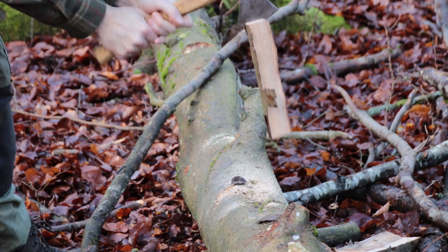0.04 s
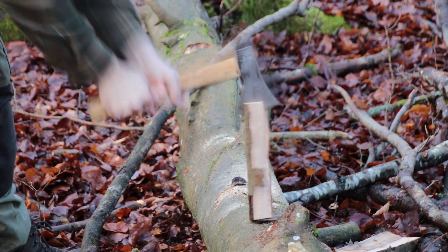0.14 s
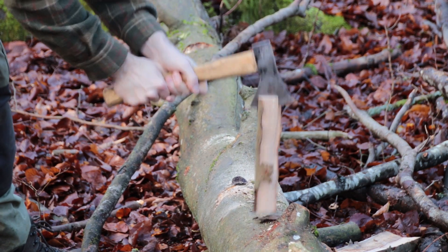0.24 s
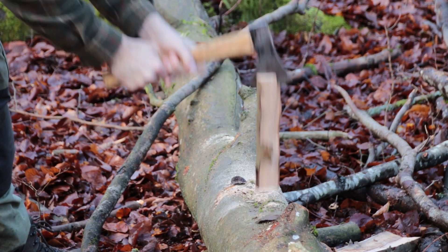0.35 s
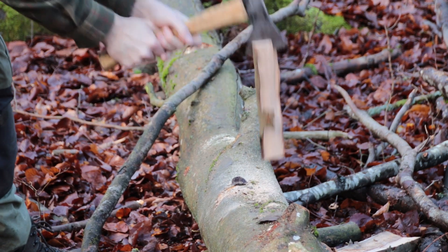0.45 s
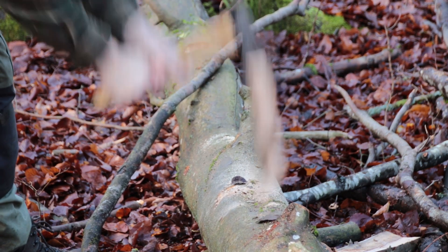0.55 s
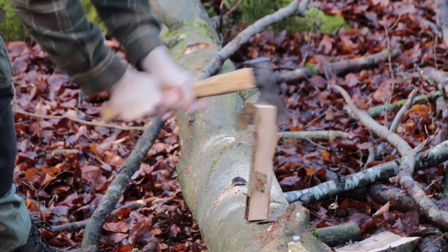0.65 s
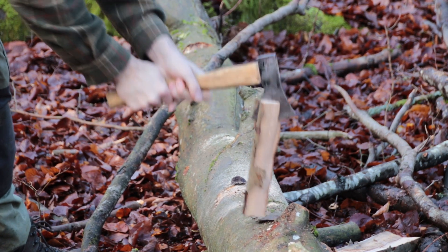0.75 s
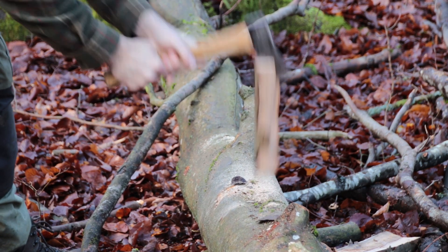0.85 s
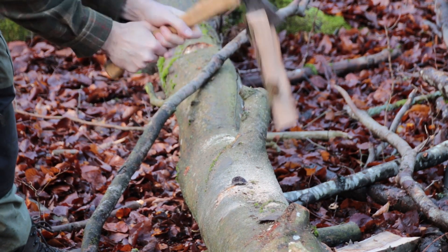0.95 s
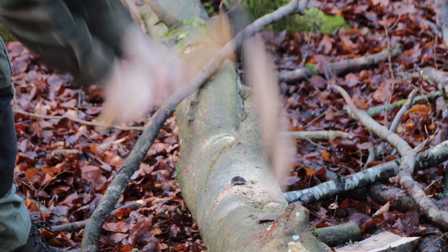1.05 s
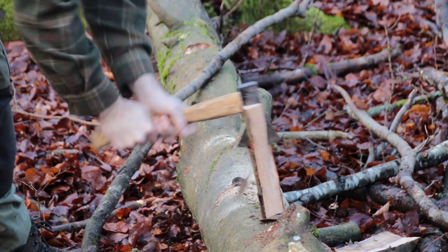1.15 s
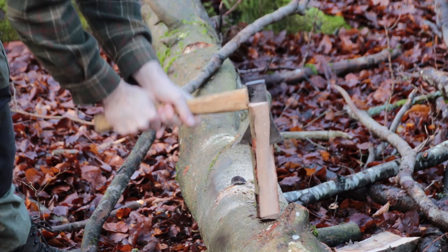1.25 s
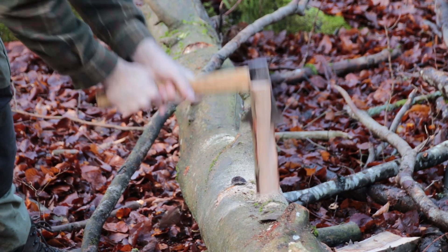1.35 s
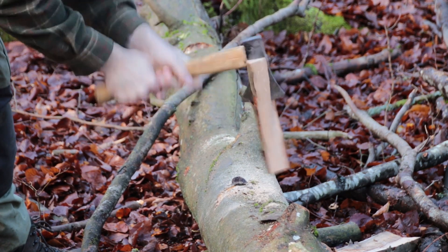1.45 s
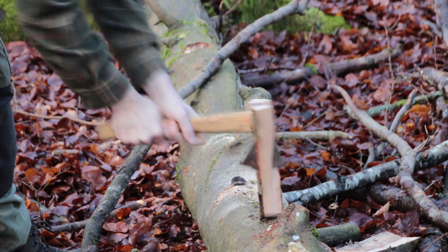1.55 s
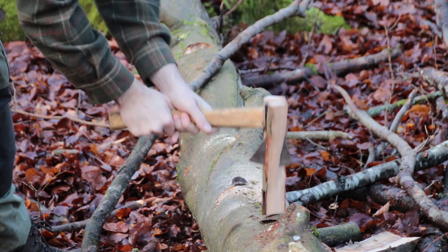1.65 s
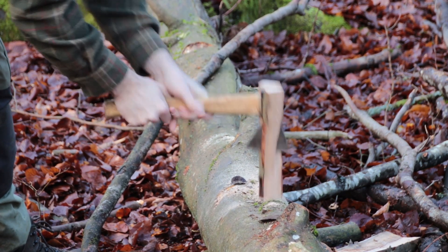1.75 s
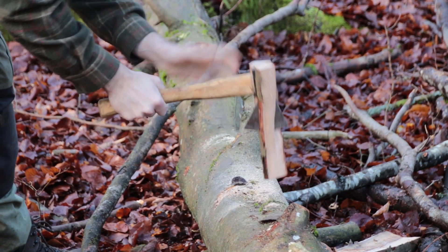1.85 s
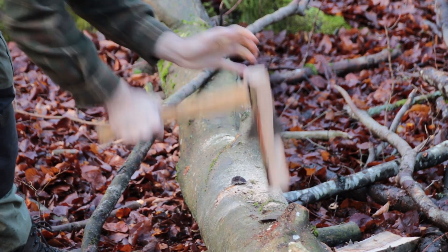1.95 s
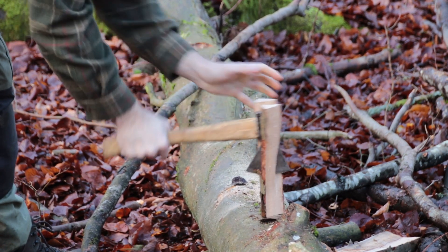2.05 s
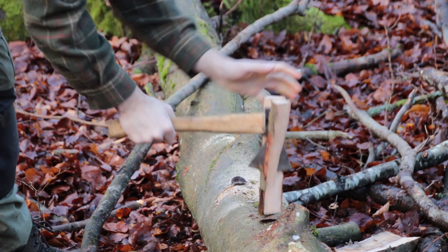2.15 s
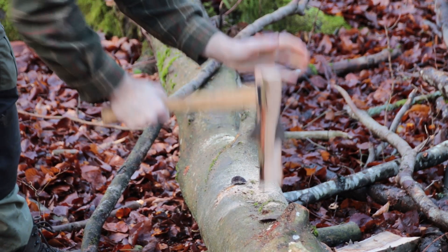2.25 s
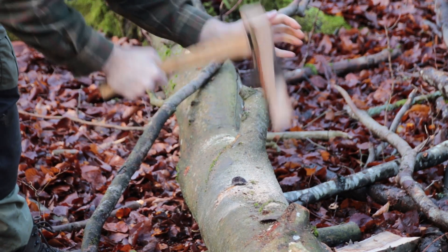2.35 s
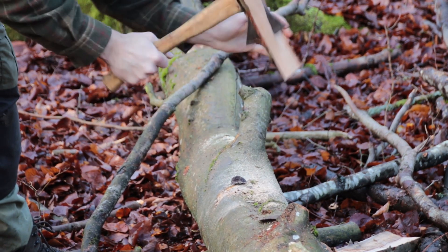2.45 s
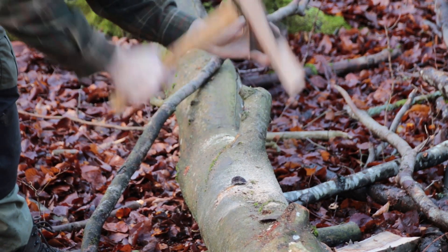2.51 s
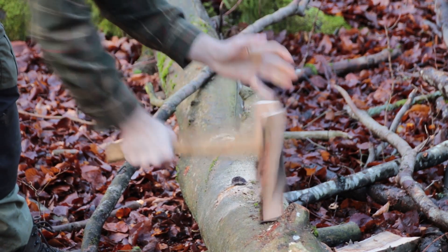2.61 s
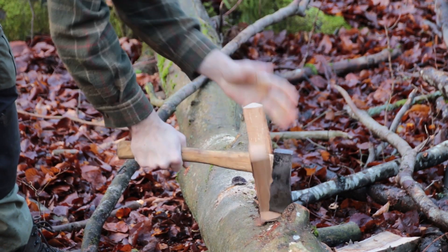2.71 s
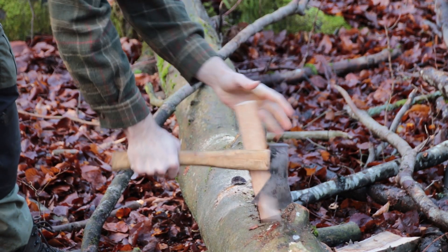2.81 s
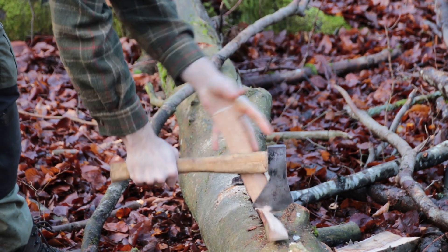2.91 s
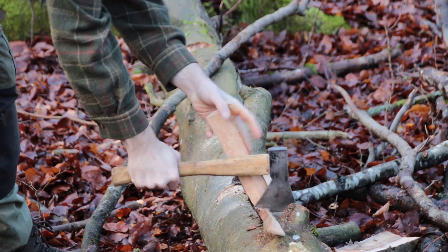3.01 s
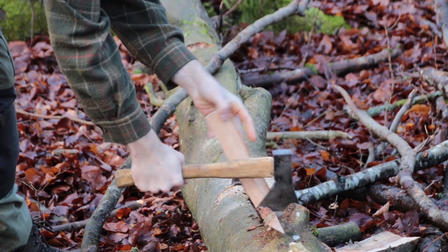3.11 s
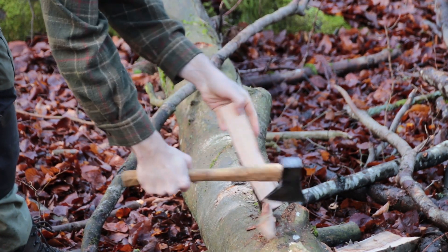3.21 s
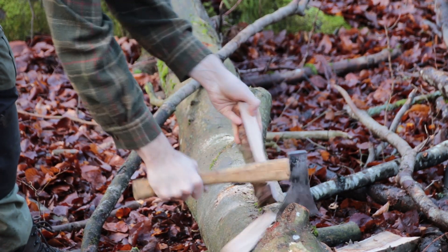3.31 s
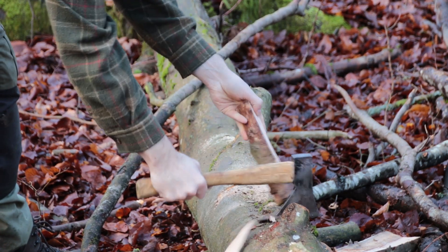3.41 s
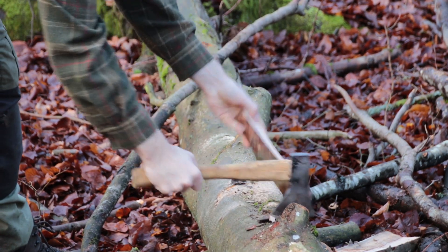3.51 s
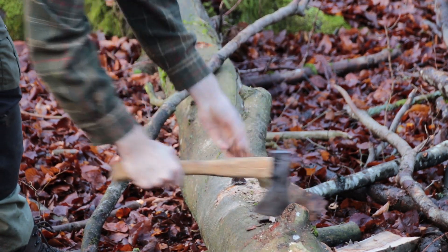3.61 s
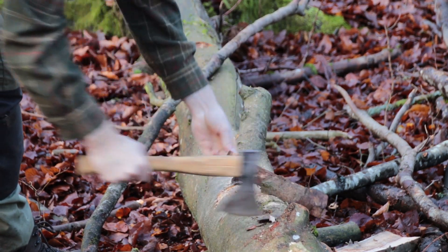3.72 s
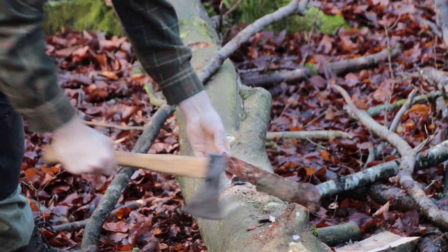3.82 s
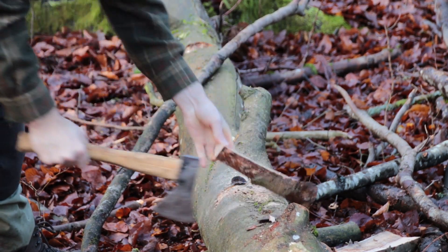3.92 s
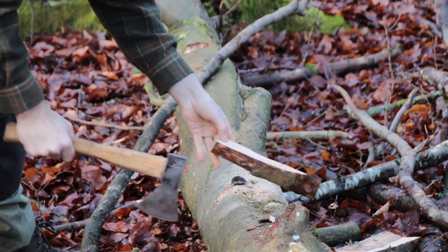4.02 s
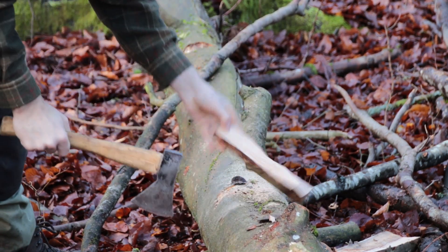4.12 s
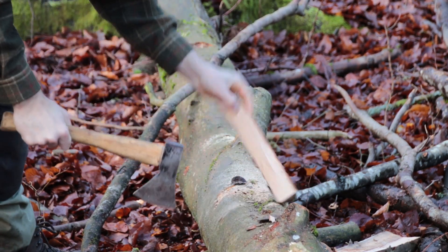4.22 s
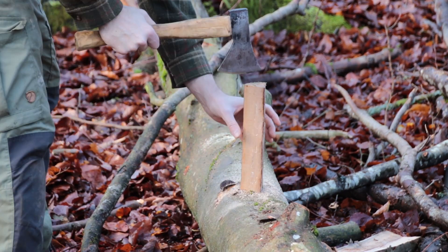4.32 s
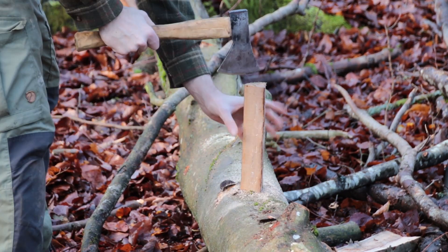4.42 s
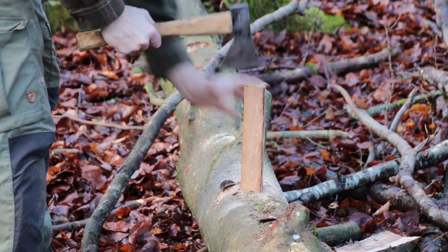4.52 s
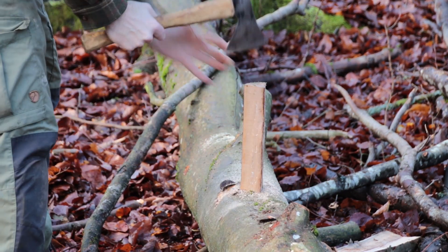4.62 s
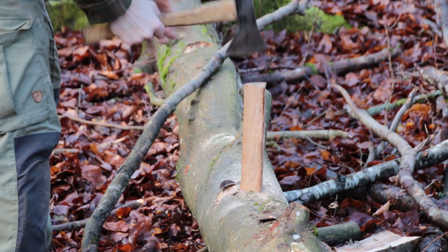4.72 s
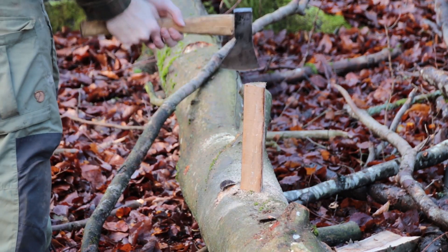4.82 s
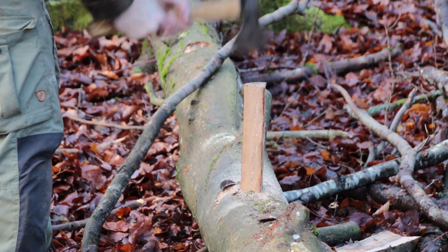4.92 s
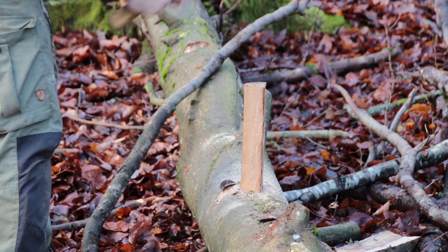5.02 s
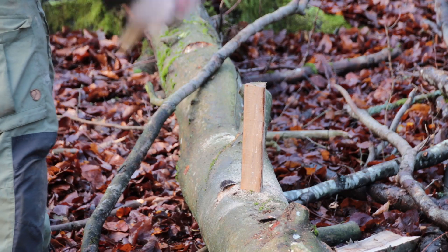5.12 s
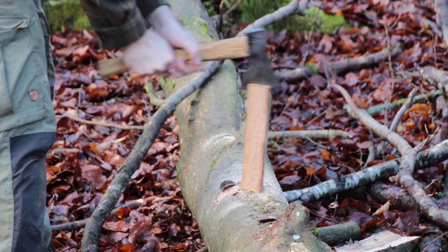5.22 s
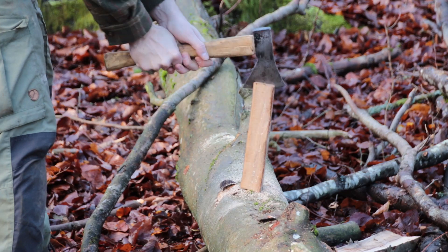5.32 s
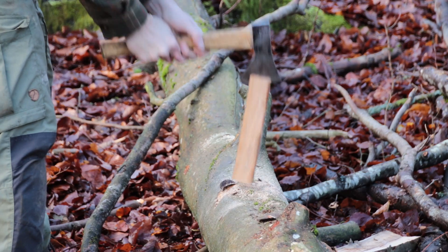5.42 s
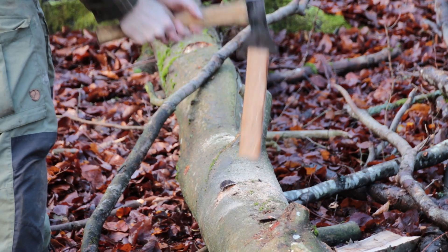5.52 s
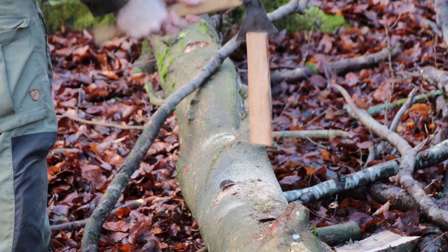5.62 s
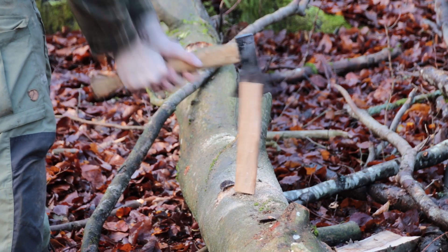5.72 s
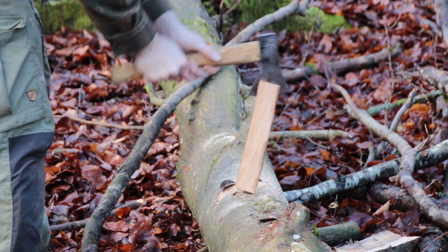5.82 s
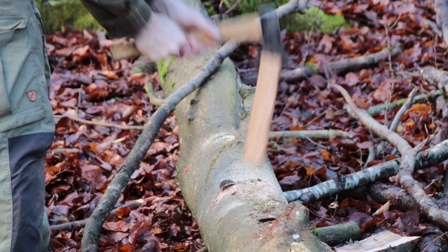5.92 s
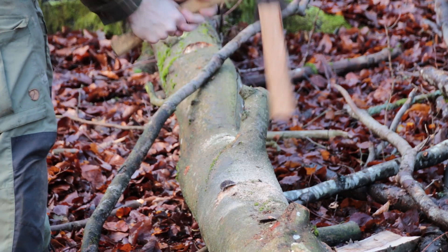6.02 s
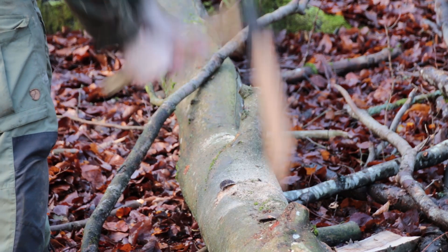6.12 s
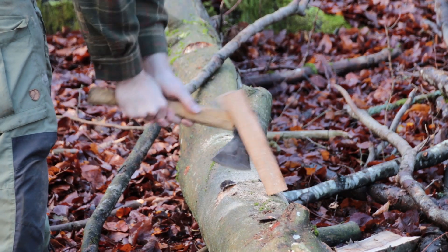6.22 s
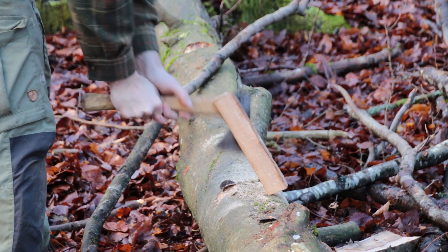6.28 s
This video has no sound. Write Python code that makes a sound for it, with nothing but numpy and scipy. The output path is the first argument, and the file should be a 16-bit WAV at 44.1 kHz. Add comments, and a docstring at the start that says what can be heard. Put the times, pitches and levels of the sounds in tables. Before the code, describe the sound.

A close microphone in a quiet forest hears a hatchet wedged in a billet being banged on a fallen log. Short, heavy, hollow thumps land at about 0.25, 0.7, 1.2, 1.6, 2.1 and 2.7 seconds, each bursting at once into dry cracks and tearing fibres. The 1.2 second blow is the strongest, with a very faint steel ring; the 2.1 second one splinters less. Small ticks and rubs fill the gaps. A weak knock and crackle come near 3.0, then handling ticks, tiny blade clinks and a clearer bark scrape around 3.4-3.65. Soft rustling leads to a light set-down knock at 4.27, then near quiet. Hard cracking blows return at 5.3, 5.8 and 6.25, with faint creaking between, the last tearing longest. Loud hits clip slightly; diffuse echoes trail into steady low air and hiss.

```python
"""Heavy woody thumps, each followed at once by crackling fibres: a hatchet stuck in a billet of firewood is
banged on a fallen beech log. Blows ring the log's damped modes; tearing is bursty noise and snaps are short
unsteady tones. Between blows the wood ticks and rubs and the blade clinks, as shaped noise and modes; late
bands of noise ring on at the cracks' pitches. Ground and trunks return diffuse echoes. One microphone near the
log, overdriven by the blows, hears it over the air of the forest and the hiss of two amplifier channels."""
import sys
import numpy as np
from scipy import signal
from scipy.fft import rfft, irfft, next_fast_len
from scipy.io import wavfile
from scipy.ndimage import uniform_filter1d

SR = 44100
rng = np.random.default_rng(int(sys.argv[2]) if len(sys.argv) > 2 else 0)


def bounce(signal):
    """Save signal as a 16-bit WAV file at the path given by the first command-line argument."""
    frames = np.transpose(np.atleast_2d(signal))
    limited = np.clip(frames, -1, 1)
    pcm = np.round(limited * 32767).astype(np.int16)
    wavfile.write(sys.argv[1], SR, pcm)


N = 280035

# blows and light knocks on the log: start_s, thump_db, contact_ms (sigma of the push), rebound_db (re thump),
# weight_db_per_octave (below 500 Hz), splintering_db, tearing_t60_s
BLOWS_ON_LOG = [(0.2525, 1.5, 0.42, -10.5, -1.5, -11, 0.052), (0.6854, -3, 0.31, 5, 1.1, -2, 0.022),
                (1.184, 7, 0.29, -4.5, -1, -6, 0.062), (1.522, -39.5, 0.52, 1, -8, -52, 0.033),
                (1.6282, -0.5, 0.32, -7, 1.5, -14, 0.081), (2.1014, -5, 0.33, -1, 3, -23, 0.04),
                (2.7228, 3, 0.3, -1, 2, -11.5, 0.064), (2.974, -31.5, 0.18, 13.5, -3.5, -34.5, 0.06),
                (3.441, -38, 0.41, 6.5, 12, -48, 0.026), (3.458, -36.5, 0.18, 8.5, 10, -57.5, .03),
                (4.2652, -41, 0.29, 12, 5, -49, 0.03), (5.205, -35.5, 0.46, 2.5, 1, -52.5, .03),
                (5.2864, 0.5, 0.38, 4, -1.5, 0, 0.029), (5.8065, -4, 0.42, 0.5, 3.5, -12.5, 0.05),
                (6.2557, 5, 0.37, -11, 0, -19, 0.14)]
# loudest fibres cracking under the blade: start_s, level_db, ring_hz, treble_db (re level)
FIBRE_CRACKS = [(0.257, -10.5, 2380, -8), (0.2588, -1, 2766, -7), (0.6882, -3, 2840, -10),
                (0.6902, -4, 2770, -30.5), (1.1863, -2, 1720, -11.5), (1.1891, 6.5, 2440, -15.5),
                (1.193, -7, 3934, -14), (1.1959, -3.5, 2855, -5), (1.2003, -1.5, 2510, -8.5),
                (1.633, -10.5, 2860, -21.5), (1.6431, 1, 2862, -10), (1.6465, -2.5, 2900, -7.5),
                (1.6492, 1, 2824, -4), (1.6622, -16, 2920, -5.5), (2.1058, -13.5, 1830, -19),
                (2.1145, -21.5, 4780, -10), (2.7254, -7.5, 2680, -15), (2.7271, -4, 1600, -7),
                (2.7314, -13, 3430, 2), (2.7424, -8.5, 4700, -2), (2.7468, -15, 3764, -3),
                (2.9791, -10, 1854, -36.5), (2.9829, -22.5, 3100, -30), (2.9956, -28.5, 1798, -22.5),
                (3.0068, -27.5, 1860, -28), (5.2902, 4.5, 2977, -2), (5.295, -4, 2760, -19),
                (5.8145, 3.5, 2983, -11.5), (5.8156, 0, 3649, -20), (5.8167, -7.5, 5076, -14.5),
                (5.8183, -10, 6900, -12), (5.8331, -22, 5080, 0), (5.8563, -26.5, 5000, -4),
                (5.8652, -24.5, 5070, 1), (6.2574, 1.5, 1757, -30), (6.2594, 5, 2753, -10),
                (6.2699, -5.5, 2825, -11.5), (6.2785, 0, 3355, -19), (6.2822, -7, 3510, -18)]


def amp(db):
    """Gain of a level in dB."""
    return 10 ** (np.asarray(db) / 20)


def along(points, hz):
    """Interpolates (Hz, value) points on a log frequency axis."""
    point_hz, value = np.transpose(points)
    return np.interp(np.log(hz + 1), np.log(point_hz + 1), value)


def filtered(x, response):
    """Multiplies the spectrum of x by a response, a function of frequency in Hz."""
    size = next_fast_len(N + SR // 2)
    hz = np.fft.rfftfreq(size, 1 / SR)
    return irfft(rfft(x, size) * response(hz), size)[..., :N]


def shaped(x, spectrum):
    """Filters x by a table of (Hz, dB)."""
    return filtered(x, lambda hz: amp(along(spectrum, hz)))


def noise(spectrum, channels=1):
    """Noise of rms 1 with the given spectrum."""
    x = shaped(rng.standard_normal((channels, N)), spectrum)
    return x / x.std()


def add(track, start_s, sound):
    """Mixes a sound into a track at start_s."""
    part = track[round(start_s * SR):][:len(sound)]
    part += sound[:len(part)]


def ring(modes, t, scatter_db, detune):
    """Sum of decaying modes, struck at new strengths and slightly shifted pitches on each call."""
    total = np.zeros(len(t))
    for hz, db, t60_s in modes:
        level_db = db + rng.normal(0, scatter_db)
        mode_hz = hz * rng.normal(1, detune)
        total += amp(level_db - 60 * t / t60_s) * np.cos(2 * np.pi * mode_hz * t)
    return total


def stroke(peak_s, rise_s, t60_s):
    """Gain that climbs 60 dB in rise_s to its peak, then dies away by 60 dB in t60_s."""
    t = np.arange(N) / SR - peak_s
    return amp(np.where(t < 0, 60 * t / rise_s, -60 * t / t60_s))


def thumps():
    """A short soft contact and its rebound ring the log's modes; each blow also shakes the ground under it."""
    # the log and the billet on it: mode_hz, level_db, t60_s
    log_modes = [(155, -6.5, .07), (208, -2.5, 0.055), (267, 1.5, 0.063), (341.6, 2, 0.088),
                 (410, -8, 0.019), (410, -0.5, .07), (525, -5.5, 0.062), (585.5, -3, 0.094),
                 (702, -2, 0.079), (788, -8.5, .05), (836, -0.5, 0.041), (962, -5, 0.027),
                 (1114, -4, 0.043), (1430, -13, 0.027)]
    rebound_s, ground_hz = 0.003875, 47
    half_push = 88  # samples
    out, ground = np.zeros(N), np.zeros(N)
    t = np.arange(SR // 3) / SR
    push_t = np.arange(-half_push, half_push + 1) / SR
    for start_s, db, contact_ms, rebound_db, weight_db, _, _ in BLOWS_ON_LOG:
        bell = (push_t / (contact_ms / 1000)) ** 2
        push = (1 - 0.83 * bell) * np.exp(-bell / 2)  # air pulled in, pushed out, pulled in
        # a squarer blow stirs the low modes
        modes = [(hz, level + weight_db * np.log2(500 / hz), t60_s) for hz, level, t60_s in log_modes]
        for at_s, level_db in (start_s, db), (start_s + rebound_s, db + rebound_db):
            body = np.convolve(ring(modes, t, scatter_db=2, detune=0.03), push)
            add(out, at_s - half_push / SR, amp(level_db) * body / body[:200].max())
        swell = 1 - np.exp(-t / .03)
        add(ground, start_s, amp(db - 48.5 - 60 * t / .6) * np.sin(2 * np.pi * ground_hz * t) * swell)
    add(out, .0258, amp(-21) * out)  # a near trunk throws the thump back once
    # the thump is cut away steeply below 125 Hz
    no_deep_bass = signal.butter(5, 125, "high", fs=SR, output="sos")
    return signal.sosfilt(no_deep_bass, out) + ground


def splintering():
    """The shock climbs the billet and tears fibres at the blade a moment after the thump: bursty noise."""
    # tearing fibres: freq_hz, level_db_per_hz
    tearing_spectrum = [(530, -11), (900, -0.5), (1830, -8), (2350, -8), (2710, -4), (3980, -5),
                        (6440, -18.5), (8480, -12), (9910, -29), (11700, -19), (15800, -36)]
    delay_s, rise_s = .0022, 0.00044
    level, t = np.zeros(N), np.arange(SR // 5) / SR
    for start_s, *_, db, t60_s in BLOWS_ON_LOG:
        add(level, start_s + delay_s, amp(db - 60 * t / t60_s) * (1 - np.exp(-t / rise_s)))
    bursts_db = 4.6 * 5.7 * uniform_filter1d(rng.standard_normal(N), 25)
    return level * amp(bursts_db) * noise(tearing_spectrum)[0]


def after_cracks(count):
    """The split runs on: each listed crack sets off weaker ones at uneven gaps and nearby pitches."""
    mean_gap_s, loss_db, scatter_db = .004, 12, 5.5
    detune, brighter_db = .12, 2.5  # detune: sigma of log pitch
    rows = []
    for start_s, db, hz, treble_db in FIBRE_CRACKS:
        at_s = start_s
        for k in range(1, count + 1):
            at_s += mean_gap_s * rng.uniform(.5, 1.5)
            level_db = db - loss_db * k + scatter_db * rng.standard_normal()
            ring_hz = hz * np.exp(detune * rng.standard_normal())
            rows.append((at_s, level_db, ring_hz, treble_db + brighter_db))
    return rows


def snaps(rows, t60_s, upper_db):
    """Each snap rings the freed sliver at an unsteady pitch and a higher mode, with a puff of treble."""
    # puff of treble: freq_hz, level_db_per_hz
    puff_spectrum = [(3500, -19), (5500, -1), (8000, 4), (10200, -9.5), (13000, -2), (16000, -13)]
    out, puffs, t = np.zeros(N), np.zeros(N), np.arange(SR // 20) / SR
    rise = 1 - np.exp(-t / 0.0005)
    for start_s, db, hz, treble_db in rows:
        wander = 0.069 * np.cumsum(rng.standard_normal(len(t)))  # rad
        phase = 2 * np.pi * hz * t + wander
        tone = np.sin(phase) + amp(upper_db) * np.sin(rng.uniform(1.7, 1.9) * phase)
        add(out, start_s, amp(db + 0.5 - 60 * t / t60_s) * rise * tone)
        add(puffs, start_s, amp(db + treble_db - 60 * t / (0.58 * t60_s)) * rise)
    return out + puffs * noise(puff_spectrum)[0]


def cracking():
    """Tearing, cracks and handling ticks of the fibres, thinned below 350 Hz."""
    # bark and loose fibres ticking as the wood is handled: start_s, level_db, ring_hz, treble_db (re level)
    handling_ticks = [(0.0742, -43.5, 4510, -6), (1.3002, -39, 3140, 5), (1.416, -38, 4480, -3),
                      (1.4468, -36.5, 2230, -13), (1.4695, -34, 2920, -17.5), (1.4939, -41.5, 4070, 0.5),
                      (1.502, -38, 3580, -9.5), (1.9425, -43, 5640, 0.5), (1.9641, -36, 1560, -10),
                      (2.8468, -41.5, 1740, 4), (3.0968, -41.5, 4464, -14.5), (3.381, -36.5, 2690, -3),
                      (3.3907, -28, 2450, -15), (3.4129, -29.5, 2180, -18.5), (3.4648, -34.5, 1950, -15),
                      (3.4986, -44.5, 4200, -7.5), (3.6351, -33.5, 2560, -4.5), (3.691, -38.5, 3990, -1.5),
                      (4.0312, -41.5, 3366, -9), (4.1269, -39.5, 5230, -13), (4.1512, -39.5, 4530, 3),
                      (4.6157, -46.5, 3150, -5.5)]
    cracks = splintering()
    cracks += snaps(FIBRE_CRACKS + after_cracks(count=2), t60_s=.012, upper_db=-14.5)
    cracks += snaps(handling_ticks, t60_s=.012, upper_db=-8.0)
    # slivers are too small for bass
    return filtered(cracks, lambda hz: 1 / np.sqrt(1 + (350 / (hz + 1)) ** 4))


def blade():
    """The steel head rings faintly in its own modes when touched."""
    # touches of the bare blade: start_s, level_db
    touches = [(1.195, -39), (3.382, -50), (3.448, -51), (3.468, -55)]
    # modes of the blade: mode_hz, level_db, t60_s
    blade_modes = [(3100, -5, 0.27), (7330, 1.5, .15), (8043, -10.5, .1)]
    out, t = np.zeros(N), np.arange(SR // 3) / SR
    rise = 1 - np.exp(-t / .002)
    for start_s, db in touches:
        add(out, start_s, amp(db) * ring(blade_modes, t, scatter_db=1.5, detune=.0005) * rise)
    return out


def crack_echoes():
    """Bands of noise ring on at the cracks' pitches after the late blows, swelling and fading."""
    # swells of the bands: peak_s, low_bands_db, high_bands_db, rise_s, t60_s
    swells = [(5.47, -54.5, -61.5, .9, 0.65), (5.862, -45, -38, .1, 0.16), (5.92, -56, -56, .1, 2)]
    # lower bands, at the cracks' pitches: center_hz, width_hz, level_db
    low_bands = [(3020, 650, -3.5), (3720, 590, 5.5)]
    # upper bands, at the cracks' pitches: center_hz, width_hz, level_db
    high_bands = [(5020, 370, -2.4), (6700, 1100, -1)]

    def resonant_noise(bands):
        """Noise of rms 1 through parallel resonance peaks."""
        def response(hz):
            return sum(amp(db) * width ** 2 / ((hz - center) ** 2 + width ** 2 / 4)
                       for center, width, db in bands)
        x = filtered(rng.standard_normal(N), response)
        return x / x.std()

    low, high = resonant_noise(low_bands), resonant_noise(high_bands)
    out = np.zeros(N)
    for peak_s, low_db, high_db, rise_s, t60_s in swells:
        out += stroke(peak_s, rise_s, t60_s) * (amp(low_db) * low + amp(high_db) * high)
    return out


def rubbing():
    """Grainy friction noise under each stroke: bark scrapes lower, cloth and dry leaves rustle higher."""
    # strokes of hands, sleeves and bark: peak_s, scrape_db, rustle_db, rise_s, t60_s
    strokes = [(1.26, -43.5, -55, .15, .2), (1.3, -45, -48, 0.0043, 0.18), (1.45, -49, -54.5, .3, .9),
               (1.61, -53.5, -59.5, .1, 0.087), (1.94, -50, -50.5, .08, 0.089),
               (1.964, -53, -55.5, .03, .15), (2.843, -53.5, -58, .01, .3), (2.924, -55.5, -58.5, 0.13, .3),
               (3.06, -55.5, -60, .1, .8), (3.392, -49.5, -49.5, 0.089, .06),
               (3.414, -45.5, -57.5, .05, 0.041), (3.46, -57.5, -62.5, 0.087, .4),
               (3.627, -35.5, -39.5, .04, 0.084), (3.67, -60, -56.5, 0.056, 0.86),
               (4.038, -65, -61, .5, 0.17), (4.084, -63, -57, .09, 0.1), (4.147, -48.5, -48.5, 0.13, 0.14),
               (4.268, -46, -61, .03, 0.085), (4.54, -63, -54, .1, .45), (5.184, -59.5, -59.5, 0.16, .4)]
    # bark scraping: freq_hz, level_db_per_hz
    scrape_spectrum = [(200, -23.5), (400, -2.5), (1300, -0.5), (2600, -3.5), (4000, -7), (6000, -29.5)]
    # cloth and leaves: freq_hz, level_db_per_hz
    rustle_spectrum = [(2500, -28.5), (4000, 0.5), (5500, -1.5), (8200, -1.5), (10500, -12), (16000, -10)]
    scrape, rustle = np.zeros(N), np.zeros(N)
    for peak_s, scrape_db, rustle_db, rise_s, t60_s in strokes:
        gain = stroke(peak_s, rise_s, t60_s)
        scrape += amp(scrape_db) * gain
        rustle += amp(rustle_db) * gain
    grain = amp(3 * 8 * uniform_filter1d(rng.standard_normal(N), 64))  # about 3 dB of scatter
    grain /= np.sqrt(np.mean(grain ** 2))
    return grain * (scrape * noise(scrape_spectrum)[0] + rustle * noise(rustle_spectrum)[0])


def answer(x, decay, swell_s, size):
    """Scattered echoes swell in, then each frequency dies at its own speed; many paths blur the pitches."""
    frames = dict(nperseg=size, noverlap=size - 128)
    hz, t, (z, chance) = signal.stft(np.array([x, rng.standard_normal(N)]), SR, **frames)
    lag_s = t[t < 1]
    swell = 1 - np.exp(-(lag_s / swell_s) ** 2)
    fade_power = (amp(-60 * lag_s / along(decay, hz)[:, None]) * swell) ** 2
    blurred = uniform_filter1d(np.abs(z) ** 2, size=3, axis=0)
    power = signal.fftconvolve(blurred, fade_power / fade_power.sum(1).mean(), axes=1)
    # the noise lends the echoes random phases
    echoes = np.sqrt(np.abs(power[:, :len(t)])) * chance / chance.std()
    return signal.istft(echoes, SR, **frames)[1][:N]


def near_echoes(log, cracks):
    """Leaf litter and near trunks scatter the sound back soon."""
    # decay: freq_hz, t60_s
    near_decay = [(150, 0.23), (500, 0.17), (3000, 0.2), (12000, 0.2)]
    # colour of what litter and trunks send back: freq_hz, level_db
    litter_colour = [(100, 1.5), (400, 1.5), (1500, 0.5), (2800, -7), (5000, -1.5), (12000, -3.5)]
    echoes = answer(log, near_decay, swell_s=0.018, size=1024)
    echoes += amp(0.96) * answer(cracks, near_decay, swell_s=.03, size=256)
    return amp(-18.5) * shaped(echoes, litter_colour)


def far_echoes(log, cracks):
    """The far forest answers more slowly and fades longer."""
    # decay: freq_hz, t60_s
    far_decay = [(150, 0.44), (800, 0.98), (3500, 1.8), (7000, 0.89), (14000, 0.73)]
    # colour of what far trunks send back: freq_hz, level_db
    bark_colour = [(100, -8), (400, -1), (1200, -0.5), (2800, -8), (5000, 2), (12000, -3)]
    echoes = answer(log, far_decay, swell_s=.06, size=1024)
    echoes += amp(0.93) * answer(cracks, far_decay, swell_s=.06, size=256)
    return amp(-32.5) * shaped(echoes, bark_colour)


def forest_air():
    """Steady noise of the forest, strongest in the bass."""
    # forest: freq_hz, level_db_per_hz
    air_spectrum = [(15, -24.5), (30, -4), (100, -2.5), (200, -5), (400, -7.5), (800, -8.5), (1500, -14),
                    (3000, -17.5), (16000, -25)]
    return amp(-57) * noise(air_spectrum)[0]


def amplifier_hiss():
    """Independent steady noise of two amplifier channels."""
    # amplifier: freq_hz, level_db_per_hz
    hiss_spectrum = [(15, -39), (25, -8), (82, 2), (123, -2.5), (1640, -8), (13500, -7.5), (15800, -9.5)]
    return amp(-57) * noise(hiss_spectrum, channels=2)


def scene():
    """Everything reaches one microphone; each channel adds its own hiss."""
    log, cracks = thumps(), cracking()
    heard = log + cracks + blade() + crack_echoes() + rubbing()
    heard += near_echoes(log, cracks) + far_echoes(log, cracks) + forest_air()
    return heard + amplifier_hiss()


def record(dry):
    """The input stage cuts off the loudest peaks and keeps nothing above its band limit."""
    ceiling, top_hz = 1.02, 15950
    clipped = np.clip(dry, -ceiling, ceiling)
    return np.clip(filtered(clipped, lambda hz: hz < top_hz), -1, 1)


dry = scene()
out = record(dry)
bounce(out)
```